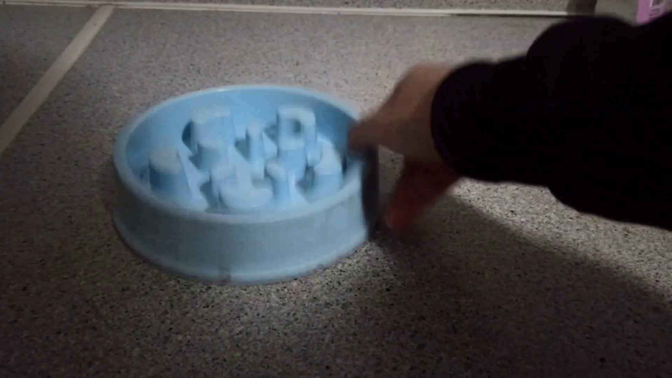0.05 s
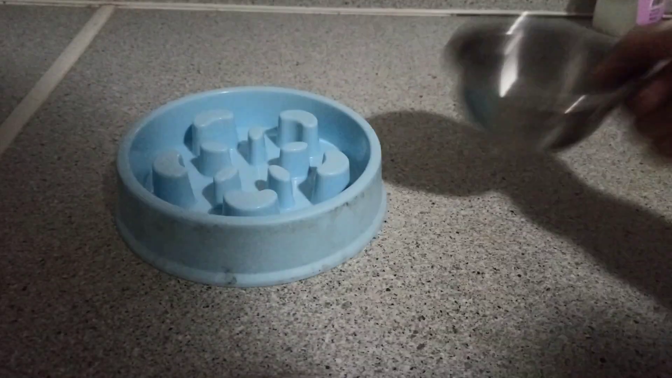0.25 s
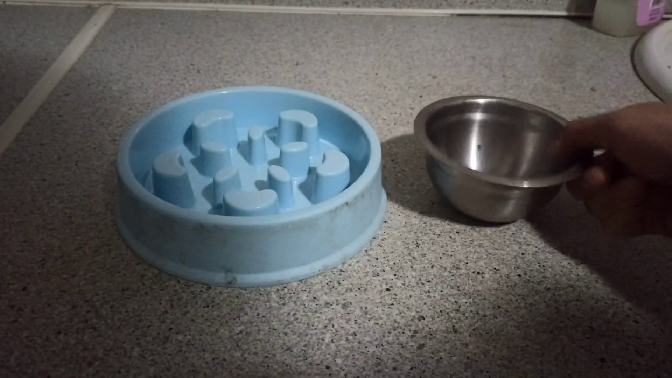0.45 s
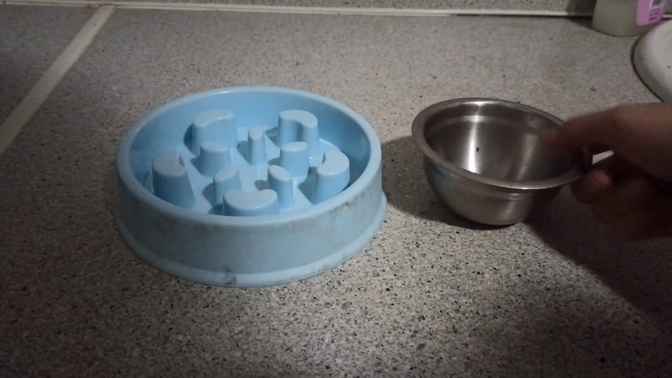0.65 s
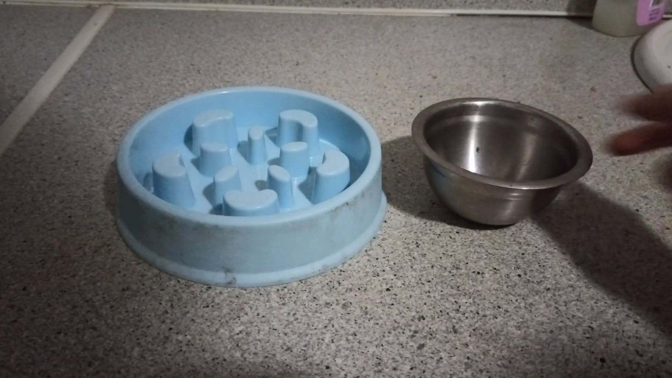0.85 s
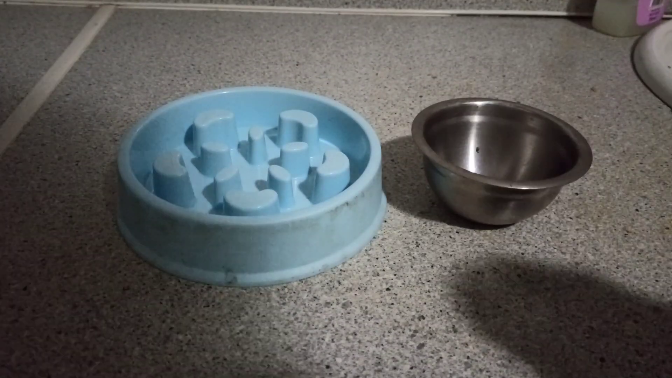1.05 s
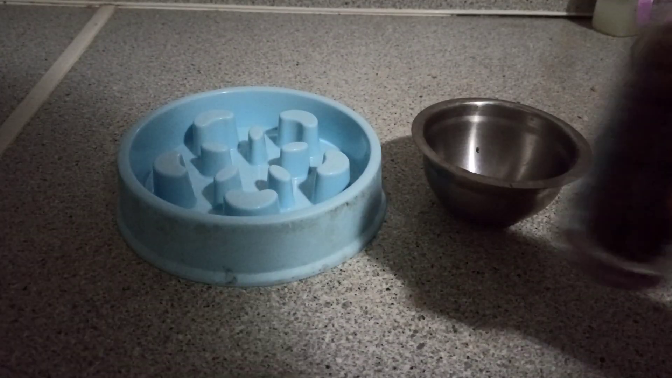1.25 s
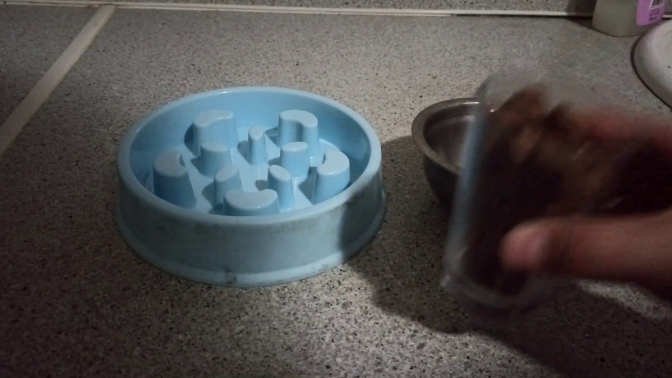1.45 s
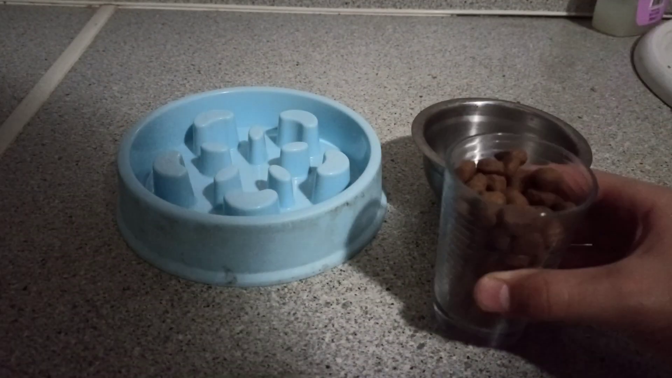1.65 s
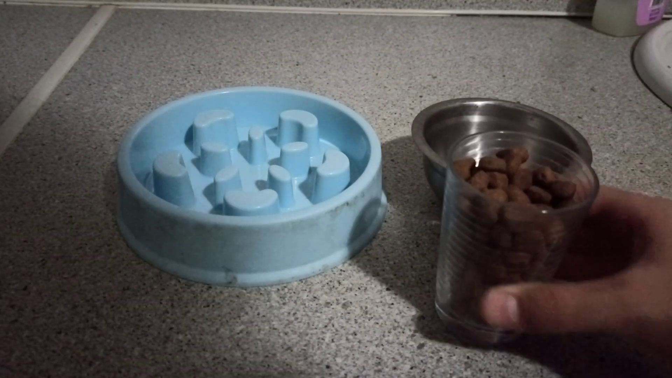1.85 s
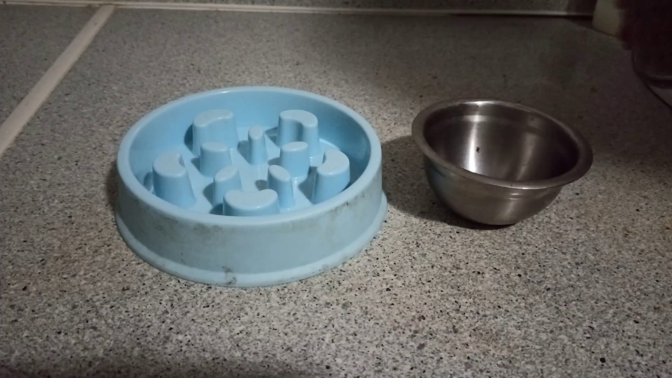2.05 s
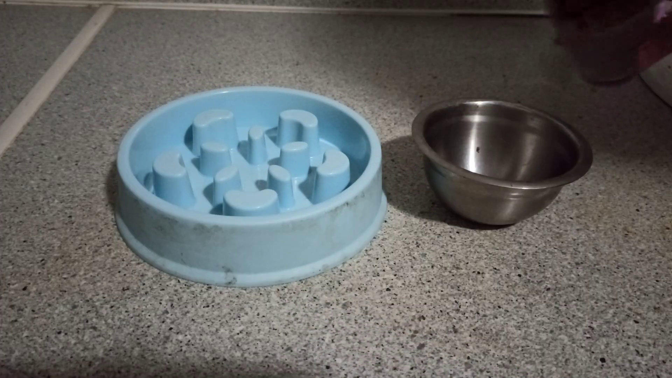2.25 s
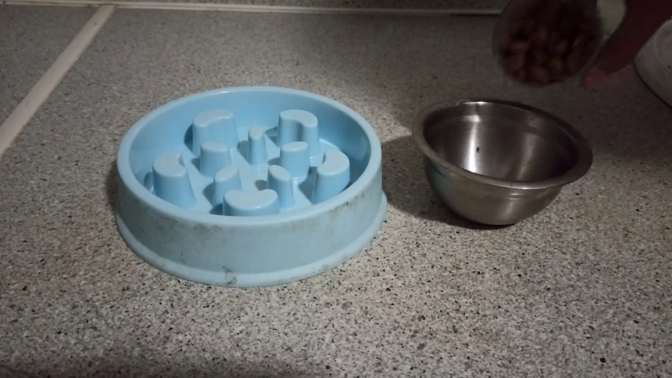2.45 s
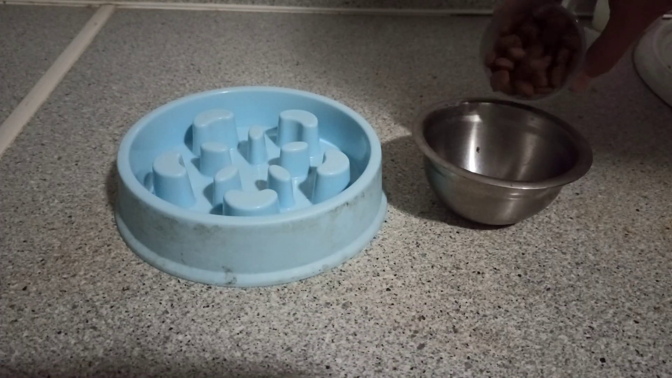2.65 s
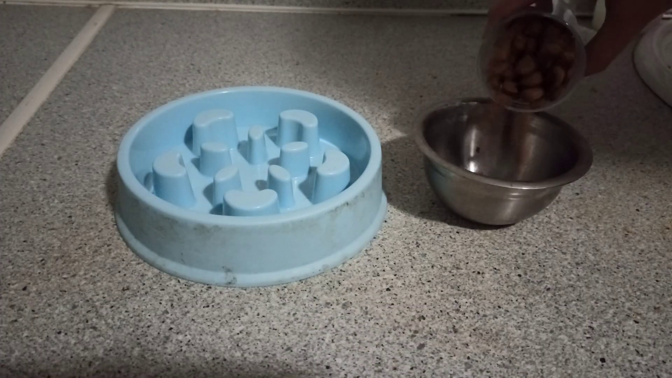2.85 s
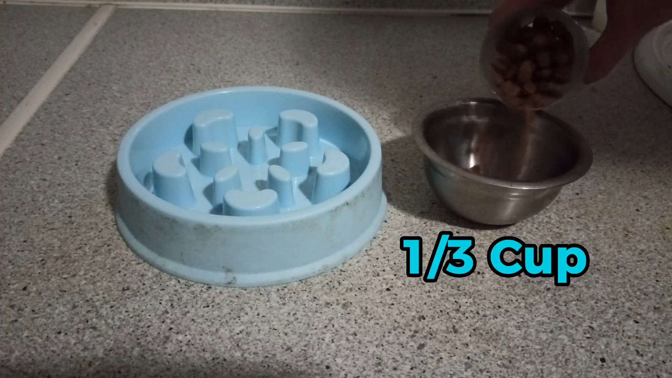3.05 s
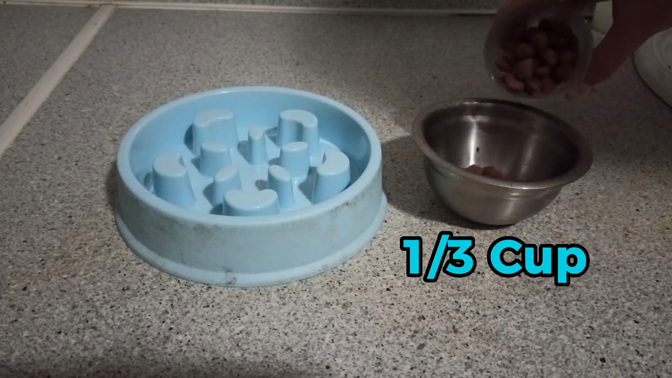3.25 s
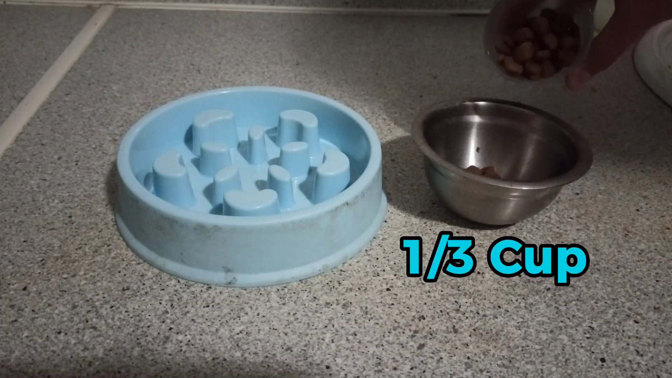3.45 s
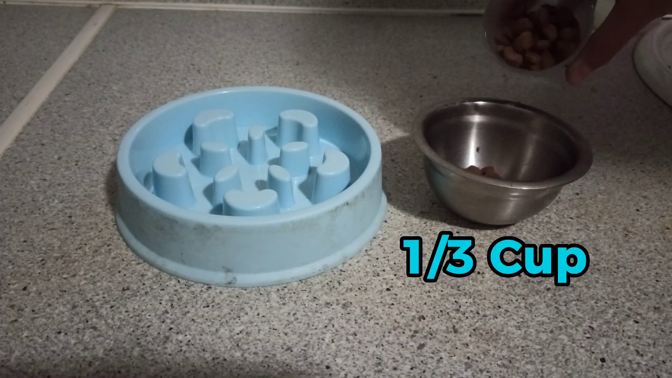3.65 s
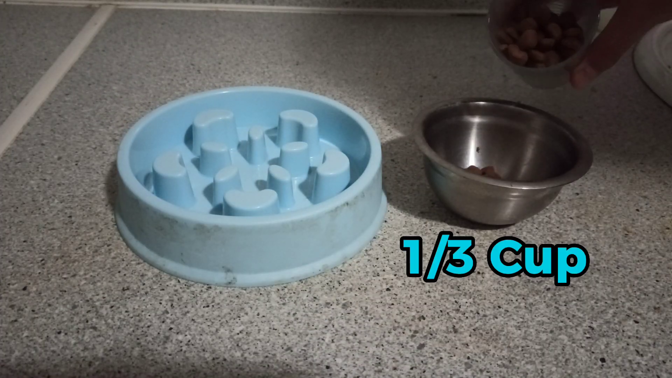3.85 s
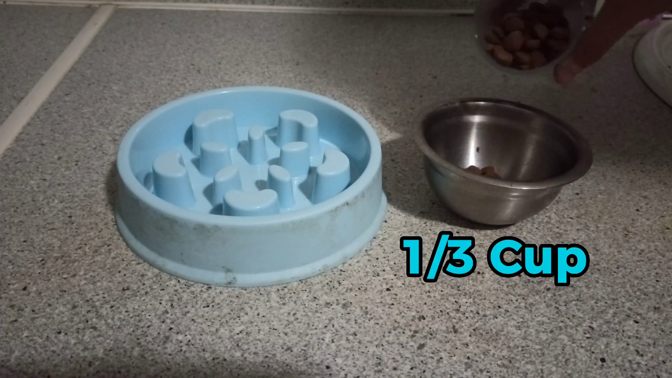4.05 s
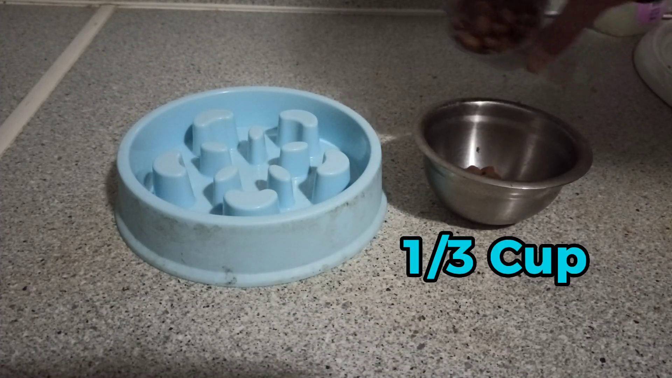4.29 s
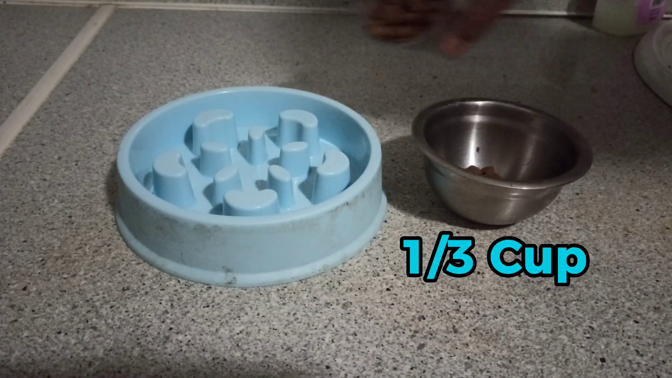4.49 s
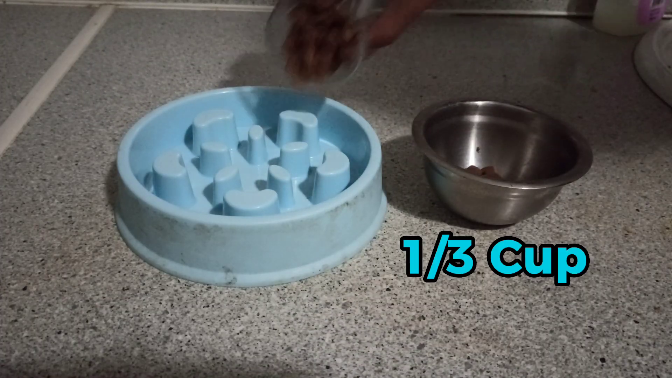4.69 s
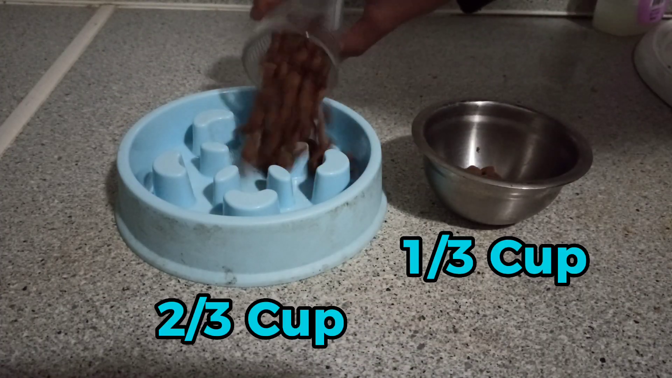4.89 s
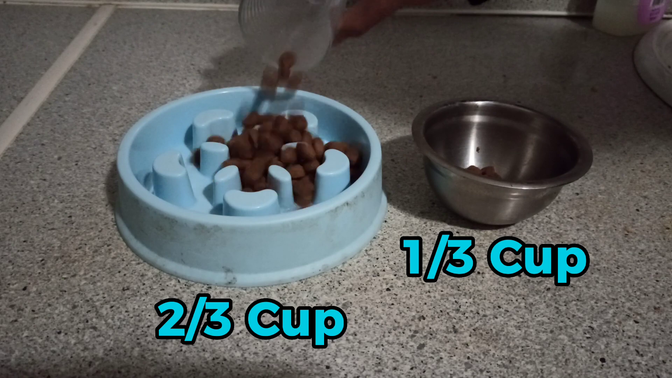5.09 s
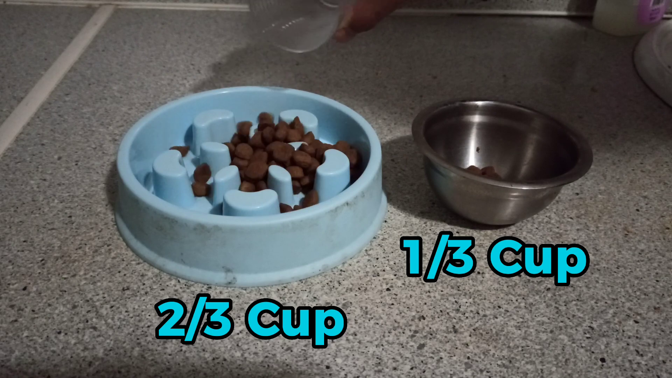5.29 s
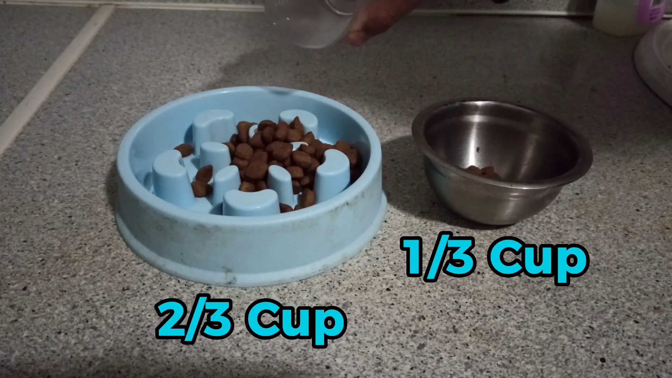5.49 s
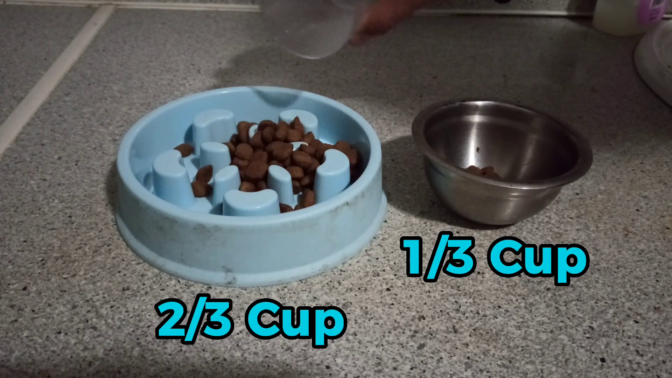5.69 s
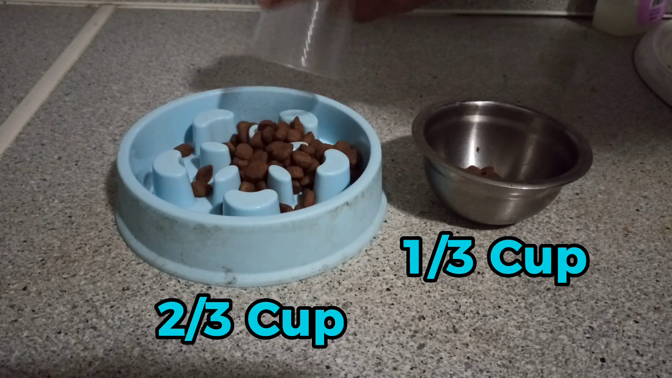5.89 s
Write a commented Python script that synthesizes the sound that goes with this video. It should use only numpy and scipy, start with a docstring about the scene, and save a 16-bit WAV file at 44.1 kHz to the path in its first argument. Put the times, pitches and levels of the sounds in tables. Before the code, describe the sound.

Plastic and steel bowls knock down on a counter, then dry kibble tinkles briefly into steel and pours rattling into hollow plastic.

```python
"""Small hard kitchen: a plastic slow-feeder bowl, a steel bowl and a cup of kibble are set down on a countertop.
The cup is tipped: a few pellets tumble into the ringing steel bowl, then the rest pours into the plastic one.
Each contact is a short coloured noise-like pulse; bowls, cup and counter ring as banks of decaying modes.
A diffuse tail follows the contacts; behind it all are filtered noise and an appliance's wavering tones."""
import sys
import numpy as np
from scipy import signal
from scipy.fft import rfft, irfft, next_fast_len
from scipy.io import wavfile

SR = 44100
rng = np.random.default_rng(int(sys.argv[2]) if len(sys.argv) > 2 else 0)


def wrap_up_sound(samples):
    """Save the sound to the file named by the first command line argument, as 16-bit audio."""
    columns = np.atleast_2d(samples).T
    # keep every value between -1 and 1, then stretch to whole-number steps
    tamed = np.clip(columns, -1, 1)
    steps = np.round(tamed * 32767).astype(np.int16)
    wavfile.write(sys.argv[1], SR, steps)


N = 261513

# left-right likeness of the sound field: f/Hz, correlation/1
LIKENESS = [(30, .65), (120, .92), (280, .83), (600, .42), (1400, .04), (15000, 0)]
# plastic bowl modes: f/Hz, level/dB, t60/s
FEEDER_MODES = [(356.3, -13, 0.3), (472, -6.5, 0.13), (520, -7.5, .11), (610, -17, 0.3), (750, -5.5, 0.071),
                (850, -6.5, 0.04), (1340, -7, 0.11), (1625, -6, 0.12), (1755, -6, 0.14)]
# steel bowl modes: f/Hz, level struck on wall/dB, level struck on foot/dB, t60/s
STEEL_MODES = [(1119, -22.5, -50, 1.5), (2358, -27, -15, .35), (2738, -18, -40, .4), (2829, -15, -40, .4),
               (2997, -15.5, -45, .85), (4444, -19, -30, .3), (4515, -10, -24, .25), (4610, -20, -12, .15),
               (4657, -8, -6, .45), (4665, -20, -9, .4), (4688, -20, -7, .22), (4719, -20, -6, .28),
               (6718, -11, -36, .45), (6783, -15, -36, .45), (7405, -6, -30, .45), (7606, -1.5, -19, .45),
               (8245, -17, -34, .3), (8423, -15, -34, .3), (12980, -27, -32, .2)]
# colour of a light contact on steel: f/Hz, relative level per Hz/dB
STEEL_CLICK = [(40, -61), (200, -27), (550, -8), (850, -12.5), (1200, -3.5), (1750, -9.5), (2700, 4.5),
               (3800, 1.5), (4650, 13), (5600, -4.5), (7000, 9), (8300, 5.5), (12500, -5.5), (15500, -1.5)]
# countertop modes: f/Hz, level/dB, t60/s
COUNTER_MODES = [(166, -6, .55), (260.3, -1, 0.63), (298, -4.5, 0.34), (407, -11.5, .35), (613, -4, .42),
                 (742, -3.5, .35)]
# brightness lost by a contact for each dB below full force (0 dB)
DULLING_DB_PER_OCTAVE_PER_DB = 0.21


def from_db(db):
    """Decibels to gain."""
    return 10 ** (np.asarray(db) / 20)


def at_hz(points, hz):
    """Read a table on a log-frequency axis."""
    known_hz, values = np.transpose(points)
    return np.interp(np.log(np.maximum(hz, 1)), np.log(known_hz), values)


def diffuse_spectrum(size):
    """Spectrum of white stereo noise arriving from all sides: alike in the bass, unrelated in the treble."""
    hz = np.arange(size // 2 + 1) * SR / size
    alike = np.clip(at_hz(LIKENESS, hz), -1, 1)
    mid, side = rfft(rng.standard_normal((2, size)))
    common = np.sqrt(1 + alike) * mid
    opposed = np.sqrt(1 - alike) * side * [[1], [-1]]
    return hz, (common + opposed) / np.sqrt(2)


def contacts(s, level_db, tilt=0):
    """Rows (t/s, level/dB, brightness/(dB/octave)); the softer a contact, the duller."""
    dulling = DULLING_DB_PER_OCTAVE_PER_DB * np.minimum(level_db, 0)
    return np.column_stack([s, level_db, tilt + dulling])


def clumps(drops, count, scatter_s, rebound_db, loss_db, spread_db, tilt_spread):
    """Each clump lands, then its pellets rebound: thick at first, then sparser and weaker over scatter_s."""
    rows = []
    # the overall rebound drop does not dull the rebounds
    undo_dulling = [0, 0, -DULLING_DB_PER_OCTAVE_PER_DB * rebound_db]
    for s, level_db, brightness in drops:
        age = ((np.arange(count) + rng.random(count)) / count) ** 2
        size, tilt = np.clip(rng.standard_normal((2, count)), -2, 2)
        force_db = level_db + rebound_db - loss_db * age + spread_db * size
        rebounds = contacts(s + scatter_s * age, force_db, brightness + tilt_spread * tilt)
        rows += [contacts(s, level_db, brightness), rebounds + undo_dulling]
    return np.vstack(rows)


def covered(hits, db_per_s):
    """As pellets cover a bowl, each later contact stirs its wall less."""
    since_first_s = hits[:, 0] - hits[0, 0]
    return hits - np.outer(since_first_s, [0, db_per_s, 0])


def stream(flows, spread_db, tilt_spread):
    """Random contacts whose rate and force swell, hold and die away together, as rows like contacts()."""
    thinning_db = 11.5  # force lost where the stream is thinnest
    rows = []
    for start, attack, hold, release, per_s, level_db in flows:
        corners_s = np.cumsum([start, attack, hold, release])
        fullness = np.interp(np.arange(N) / SR, corners_s, [0, 1, 1, 0])
        chance = rng.random(N)
        size, tilt = rng.standard_normal((2, N))
        at = np.flatnonzero(chance < fullness * per_s / SR)
        thinned_db = level_db - thinning_db * (1 - fullness[at])
        force_db = thinned_db + spread_db * np.clip(size[at], -2, 1.5)
        rows.append(np.column_stack([at / SR, force_db, tilt_spread * tilt[at]]))
    return np.vstack(rows)


def strike(hits, colour, vary_db, lag, rattle_db, rattle_t60, scatter=0, size=2048):
    """Each contact is a causal pulse and a brief rattle, with its own colour; lag delays the left, in samples."""
    bend_delay_s = .0006  # at 1 kHz; treble runs faster through a plate
    hz, t = np.arange(size // 2 + 1) * SR / size, np.arange(size) / SR
    out = np.zeros((2, N + size))
    octave = np.log2(np.clip(hz, 200, 9000) / 1000)
    knots = np.geomspace(200, 16000, num=24)
    draws = np.random.default_rng(rng.integers(2 ** 31))
    fade = from_db(-60 * t / rattle_t60) * (t > 0)
    fade = from_db(rattle_db) * fade / np.sqrt(np.sum(fade ** 2))
    apart = np.clip(1 - at_hz(LIKENESS, hz), 0, 1) / 2
    bend = np.exp(-4j * np.pi * bend_delay_s * np.sqrt(1000 * hz))
    for s, level_db, tilt in hits:
        luck = draws.standard_normal(len(knots) + 2)
        ripple_db = vary_db * np.interp(hz, knots, luck[2:])
        shape = from_db(at_hz(colour, hz) + tilt * octave + ripple_db)
        shape = shape / np.sqrt(np.mean(shape ** 2))
        # minimum phase: the energy comes at once and then dies away
        cepstrum = irfft(np.log(np.maximum(shape, 1e-3)))
        cepstrum[1:size // 2] *= 2
        spectrum = from_db(level_db) * bend * np.exp(rfft(cepstrum[:size // 2], size))
        mid, side = rfft(fade * draws.standard_normal((2, size)))
        for channel, sign in enumerate((1, -1)):
            rattle = np.sqrt(1 - apart) * mid + sign * np.sqrt(apart) * side
            at = round(s * SR + sign * (lag / 2 + scatter * luck[0]))
            pan = from_db(sign * scatter * luck[1] / 2)
            out[channel, at:at + size] += pan * irfft(spectrum * (1 + rattle))
    return out[:, :N]


def ring(hits, modes, vary_db, centre_hz):
    """Every contact sets each mode ringing with a new strength; a mode's dB is its share of energy."""
    s, level_db, tilt = np.transpose(hits)
    out = np.zeros((2, N))
    draws = np.random.default_rng(rng.integers(2 ** 31))
    luck = draws.standard_normal((len(s), len(modes), 3)).T
    for k, (hz, mode_db, t60) in enumerate(modes):
        r, w = from_db(-60 / (t60 * SR)), 2 * np.pi * hz / SR  # pole radius and angle
        bright_db = tilt * np.log2(hz / centre_hz)
        strength = from_db(level_db + mode_db + bright_db + vary_db * luck[2, k])
        apart = np.sqrt(np.clip(1 - at_hz(LIKENESS, hz), 0, 1))
        for channel in (0, 1):
            clicks = np.full(N, 1e-18)
            # each contact has its own phase in each channel
            at = np.round(s * SR + apart * luck[channel, k] / w).astype(int)
            np.add.at(clicks, at, strength)
            ringing = signal.lfilter([1, 0, -1], [1, -2 * r * np.cos(w), r * r], clicks)
            out[channel] += np.sqrt((1 - r * r) / 2) * ringing
    return out


def kitchen(x, room_db, size=32768):
    """Direct sound and a diffuse tail that builds at once off the counter and walls and dies band by band."""
    # room decay: f/Hz, t60/s
    room_t60 = [(120, 0.74), (400, 0.5), (1200, 0.41), (3500, 0.37), (8000, 0.36), (15000, 0.099)]
    hz, noise = diffuse_spectrum(size)
    t, centres = np.arange(size) / SR, np.geomspace(100, 16000, num=8)
    tail = 0
    for centre, share in zip(centres, np.eye(len(centres))):
        band = irfft(noise * at_hz(np.column_stack([centres, share]), hz))
        tail = tail + band * from_db(-60 * t / at_hz(room_t60, centre))
    tail = tail * np.clip(t / 0.00014, 0, 1)
    tail = tail / np.sqrt(np.sum(tail ** 2) / 2)
    return x + from_db(room_db) * signal.fftconvolve(x, tail, axes=1)[:, :N]


def background():
    """Soft noise rumble, whose midrange sinks for a while, and the slightly wavering hum of an appliance."""
    # noise colour: f/Hz, relative level per Hz/dB
    air_colour = [(25, -37), (60, -21), (85, -10.5), (100, -0.5), (125, -11.5), (200, -9.5), (340, -7),
                  (450, -15.5), (680, -3.5), (1260, -23), (4000, -29.5), (7500, -31.5), (16000, -39.5)]
    # midrange band: f/Hz, share/1
    midrange_share = [(400, 0), (600, 1), (1000, 1), (1600, 0)]
    # midrange level over time: t/s, level/dB
    midrange_db = [(3.3, 1.5), (4.1, -6.5), (4.7, -3), (5.6, 1)]
    # steady tones: f/Hz, RMS level/dB
    hum_tones = [(98, -58.5), (258, -74.5), (301, -67), (490, -67), (667, -71.5), (2110, -78.5),
                 (3978, -81.5)]
    air_db, waver_rad = -53.5, 4.0
    hz, noise = diffuse_spectrum(next_fast_len(N, real=True) * 2)
    t, hum = np.arange(N) / SR, 0
    spectrum = noise * from_db(at_hz(air_colour, hz))
    air = irfft(spectrum)[:, :N]
    midrange = irfft(spectrum * at_hz(midrange_share, hz))[:, :N]
    sinking = midrange * (from_db(np.interp(t, *np.transpose(midrange_db))) - 1)
    for tone_hz, level_db in hum_tones:
        waver = np.interp(t, np.linspace(0, t[-1], num=40), rng.standard_normal(size=40))
        tone = np.sin(2 * np.pi * tone_hz * t + waver_rad * waver)
        hum = hum + np.sqrt(2) * from_db(level_db) * tone
    return from_db(air_db) * (air + sinking) / air.std() + hum


def feeder_set_down():
    """The plastic bowl cracks down on an edge, slides, claps flat and stirs its low modes; the tail breaks off."""
    # edge contacts: t/s, level/dB, brightness/(dB/octave)
    edge_knocks = [(.0134, 10.5, 1.5), (.0146, 8.5, 0), (.0178, 6.5, -5)]
    # flat contacts: t/s, level/dB, brightness/(dB/octave)
    flat_knocks = [(.128, 15.5, -1.5), (.1305, 13, 0), (.1395, 12, -.5), (.1485, 5, -1.5)]
    # slide: start/s, attack/s, hold/s, release/s, contacts/(1/s), level/dB
    slide = [(.02, .005, .085, .04, 650, -13.5)]
    # edge colour: f/Hz, relative level per Hz/dB
    edge_crack = [(60, -34), (250, -25), (550, -14), (850, 0), (1300, -11), (1700, -21), (2500, -23),
                  (3100, -14), (4000, -16), (5200, -27), (6400, -18), (8000, -21), (13000, -31)]
    # flat and sliding colour: f/Hz, relative level per Hz/dB
    thud_colour = [(60, -27), (150, -13.5), (270, -8), (420, -1), (520, 5.5), (780, 3), (1000, -2.5),
                   (1300, 0), (1800, -9.5), (2400, -17.5), (3500, -15.5), (5200, -28), (7000, -17.5),
                   (12500, -44.5), (15500, -36.5)]
    break_s, break_fade_s = .291, .003
    edge = strike(edge_knocks, edge_crack, vary_db=.5, lag=3, rattle_db=-4, rattle_t60=.025)
    sliding = stream(slide, spread_db=5.0, tilt_spread=1.0) + [0, 0, 1.2]
    hits = np.vstack([flat_knocks, sliding])
    thuds = strike(hits, thud_colour, vary_db=2.5, lag=-1.5, rattle_db=0, rattle_t60=0.025)
    low_modes = [mode for mode in FEEDER_MODES if mode[0] < 1000]
    shell = from_db(-7.5) * ring(hits, low_modes, vary_db=0.0, centre_hz=787)
    until_break = np.clip((break_s - np.arange(N) / SR) / break_fade_s, 0, 1)
    return (kitchen(from_db(-4) * thuds + from_db(-1) * edge, room_db=-6) + shell) * until_break


def steel_set_down():
    """The steel bowl lands and bounces on its foot, whose close modes beat, and is nudged into place."""
    # foot contacts: t/s, level/dB, brightness/(dB/octave)
    foot_knocks = [(.4348, 9, -1.23), (.4374, 3, -0.5), (.4888, 7.5, -1)]
    # nudge: start/s, attack/s, hold/s, release/s, contacts/(1/s), level/dB
    slide = [(.655, .025, .015, .045, 1400, -48)]
    # foot colour: f/Hz, relative level per Hz/dB
    thud_colour = [(50, -21.5), (100, -20), (220, -8.5), (420, -8), (600, -2.5), (900, -4), (1350, 2),
                   (1800, -6), (2500, -16.5), (3300, -15), (4600, -26), (5400, -27), (7600, -21),
                   (13000, -33)]
    foot_modes = [(hz, foot_db, t60) for hz, wall_db, foot_db, t60 in STEEL_MODES]
    knocks = strike(foot_knocks, thud_colour, vary_db=1.54, lag=3, rattle_db=3.5, rattle_t60=0.012)
    scrape = stream(slide, spread_db=2.5, tilt_spread=.5)
    nudge = strike(scrape, STEEL_CLICK, vary_db=2, lag=3, rattle_db=0, rattle_t60=.01)
    foot = from_db(-3.5) * ring(foot_knocks, foot_modes, vary_db=1, centre_hz=4000)
    counter = from_db(-12) * ring(foot_knocks, COUNTER_MODES, vary_db=1, centre_hz=400)
    return kitchen(knocks + nudge, room_db=-3.5) + kitchen(foot, room_db=-5) + counter


def cup():
    """The full cup thumps on the counter, which booms; later pellets tick and slide on its wall as it tilts."""
    # cup on counter: t/s, level/dB, brightness/(dB/octave)
    cup_knocks = [(1.5974, 13, 2), (1.5996, 5.5, 3)]
    # pellets shifting against the wall: t/s, level/dB, brightness/(dB/octave)
    cup_ticks = [(1.812, -45, 2), (1.858, -34, 2), (2.4882, -21, 5), (2.518, -41, 0.5), (2.614, -53, 4),
                 (2.6843, -45, -1), (2.7526, -49.5, -7.5), (2.8096, -30, -8), (2.8545, -25.5, 7)]
    # pellets sliding out: start/s, attack/s, hold/s, release/s, contacts/(1/s), level/dB
    slide = [(4.765, 0.071, .015, 0.04, 600, -34)]
    # thump colour: f/Hz, relative level per Hz/dB
    thud_colour = [(50, -34), (100, -8.5), (175, 2.5), (300, 1.5), (480, -10), (700, 2.5), (900, -3),
                   (1300, -3), (2100, -5.5), (2900, -17.5), (4000, -16), (5200, -34), (6500, -22),
                   (13000, -43.5)]
    # tick colour: f/Hz, relative level per Hz/dB
    tick_colour = [(800, -28.5), (2800, -3), (4500, -5.5), (6200, -14.5), (9000, -13), (15000, -17)]
    # cup wall modes: f/Hz, level/dB, t60/s
    cup_modes = [(2660, 0, .04), (2756, 3, 0.1), (2860, 0, .05), (6120, 3, .05), (6212, 7, 0.085),
                 (6300, 3, .06), (6632, -1, 0.06)]
    thump = strike(cup_knocks, thud_colour, vary_db=.8, lag=2, rattle_db=-5, rattle_t60=0.02)
    counter = from_db(-9) * ring(cup_knocks, COUNTER_MODES, vary_db=1, centre_hz=400)
    shifts = np.vstack([cup_ticks, stream(slide, spread_db=3.5, tilt_spread=0.75)])
    ticks = strike(shifts, tick_colour, vary_db=2.5, lag=2, rattle_db=2, rattle_t60=0.04)
    wall = from_db(-8.5) * ring(shifts, cup_modes, vary_db=2.5, centre_hz=4500)
    bumps = kitchen(from_db(-2.5) * thump + from_db(-12.0) * ticks, room_db=1.5)
    return bumps + kitchen(wall, room_db=0.5) + counter


def pour_into_steel():
    """Clumps ring the thin wall, less as they cover it; the bowl rocks; rolling stirs its longest modes."""
    # clumps landing: t/s, level/dB, brightness/(dB/octave)
    steel_drops = [(2.8803, 3.5, 8), (2.9247, -1.5, -2.5), (2.934, -29, -3), (2.982, -1, -3.5),
                   (2.998, -0.5, -1.5), (3.016, -17, -3), (3.0958, 0.5, -1), (3.1142, 2, -2.5),
                   (3.128, -7.5, -2.5), (3.2384, -12, -1), (3.3826, -17.5, -2.5)]
    # bowl rocking on its foot: t/s, level/dB
    steel_rocks = [(2.882, -8), (2.966, -12), (2.994, -11.5), (3.054, -13), (3.125, -17), (3.164, -10),
                   (3.177, -17.5), (3.192, -23), (3.228, -16), (3.286, -17.5)]
    # pellets rolling to rest, as one excitation: t/s, level/dB
    steel_rolls = [(3.17, 10.5)]
    # rocking colour: f/Hz, relative level per Hz/dB
    rock_tap = [(100, -25), (350, -19.5), (580, -6), (850, -6.5), (1300, 0), (1700, -23), (2500, -30),
                (8000, -47.5)]
    long_ring_s = .7  # longer modes are stirred by rolling, not by drops
    # the bowl is not quite round, so its lowest mode beats
    beat_hz, beat_depth, beat_crest_s = 6.6, .95, 3.195
    left_db = -0.5
    hits = clumps(steel_drops, count=4, scatter_s=.05, rebound_db=-11.0, loss_db=22,
                  spread_db=2.5, tilt_spread=1.2)
    wall_modes = [(hz, wall_db, t60) for hz, wall_db, foot_db, t60 in STEEL_MODES]
    short_modes = [mode for mode in wall_modes if mode[2] < long_ring_s]
    long_modes = [mode for mode in wall_modes if mode[2] > long_ring_s]
    clicks = strike(hits, STEEL_CLICK, vary_db=1, lag=3, rattle_db=4, rattle_t60=0.02, scatter=1.1)
    rocks = contacts(*np.transpose(steel_rocks))
    rocking = strike(rocks, rock_tap, vary_db=0.0, lag=3, rattle_db=-6.5, rattle_t60=0.018)
    wall = from_db(3) * ring(covered(hits, db_per_s=26.0), short_modes, vary_db=4.5, centre_hz=4610)
    rolls = contacts(*np.transpose(steel_rolls), tilt=-3.5)
    lowest, upper = [ring(rolls, [mode], vary_db=.5, centre_hz=2980) for mode in long_modes]
    since_crest_s = np.arange(N) / SR - beat_crest_s
    beat = np.sqrt(1 + beat_depth * np.cos(2 * np.pi * beat_hz * since_crest_s))
    bowl = from_db(-1.0) * kitchen(clicks + rocking, room_db=-2) + wall + lowest * beat + upper
    return from_db([[left_db], [-left_db]]) * bowl


def pour_into_feeder():
    """A thick stream drums on hollow plastic, then on the heap; each clump pings on landing; stragglers settle."""
    # clumps landing: t/s, level/dB, brightness/(dB/octave), ping f/Hz, ping level/dB
    feeder_drops = [(4.8488, 5, -1.5, 1700, 1), (4.8555, 3, 1, 7200, 5), (4.8893, 4, 0, 3700, 2),
                    (4.9165, 2, -1, 2400, -1), (4.9256, 3.5, .5, 3350, 7), (4.946, 2.5, -1, 4200, -2),
                    (4.959, 2.5, -1, 3000, -3), (4.9775, 1, 0, 2300, -2), (4.9909, 2, .5, 4100, 2),
                    (4.995, 2, 1, 7000, 6), (5.0667, -2, .5, 5800, -6), (5.0929, -1, -1, 1800, -4),
                    (5.0986, 3, -.5, 6000, -2), (5.107, -1, 0, 6500, -5), (5.1442, -1, 0, 3500, -3),
                    (5.156, -2, -1, 3000, -8), (5.1822, 2, -.5, 3200, -3), (5.2131, 0, .5, 3300, 4),
                    (5.2219, 1, 0, 2900, 1), (5.2766, -2, 0, 3100, -2), (5.3013, -7, 0, 3200, -3),
                    (5.362, -10, -1.5, 3200, -14), (5.3984, -17, 1.5, 3000, -13),
                    (5.4183, -18, 0, 3100, -14), (5.4476, -16, 0, 2900, -16), (5.4584, -23, 0, 3000, -22)]
    # stream on plastic: start/s, attack/s, hold/s, release/s, contacts/(1/s), level/dB
    feeder_flow = [(4.85, .06, .14, .28, 620, -10)]
    # stream on the heap: start/s, attack/s, hold/s, release/s, contacts/(1/s), level/dB
    heap_flow = [(5.05, .17, 0.07, 0.05, 300, -15)]
    # heap settling: start/s, attack/s, hold/s, release/s, contacts/(1/s), level/dB
    heap_settle = [(5.37, .04, .03, .05, 240, -29)]
    # pellet on plastic: f/Hz, relative level per Hz/dB
    feeder_click = [(60, -52), (160, -15), (300, -9), (470, 1.5), (700, -4), (1000, -3), (1700, -1),
                    (2200, -5), (3200, -1.5), (4500, -5), (5200, -8.5), (7500, -6), (12500, -29),
                    (15500, -30)]
    # pellet on pellet: f/Hz, relative level per Hz/dB
    pellet_click = [(60, -22.5), (800, -27), (2200, 9), (2700, 22), (3300, 21.5), (4400, -14.5),
                    (7000, -15.5), (15000, -24.5)]
    # hard pellet's brief ping: multiple of ping f/1, level/dB, t60/s
    pellet_modes = [(1, -1, .006), (1.16, -4, .004)]
    left_db = 0.5
    landings = clumps([drop[:3] for drop in feeder_drops], count=4, scatter_s=.04, rebound_db=-6.0,
                      loss_db=4.0, spread_db=2, tilt_spread=0.5)
    hits = np.vstack([landings, stream(feeder_flow, spread_db=3.0, tilt_spread=2.5)])
    clicks = strike(hits, feeder_click, vary_db=5.0, lag=-2, rattle_db=1, rattle_t60=0.022, scatter=1.4)
    pings = 0
    for s, _, _, hz, ping_db in feeder_drops:
        modes = [(hz * ratio, db, t60) for ratio, db, t60 in pellet_modes]
        pings = pings + ring([(s, ping_db, 0)], modes, vary_db=-0.5, centre_hz=hz)
    on_heap = np.vstack([stream(heap_flow, spread_db=7, tilt_spread=0.63),
                         stream(heap_settle, spread_db=4, tilt_spread=1.7)])
    heap = strike(on_heap, pellet_click, vary_db=1.5, lag=-8.5, rattle_db=-6.5, rattle_t60=0.0045,
                  scatter=6.0)
    shell = from_db(-8.5) * ring(covered(hits, db_per_s=2.5), FEEDER_MODES, vary_db=3, centre_hz=810)
    pellets = kitchen(clicks + from_db(-2.0) * pings + heap, room_db=-6.5)
    return from_db([[left_db], [-left_db]]) * (from_db(-3.0) * pellets + shell)


def dips():
    """Gain that falls quickly, stays down for a moment and creeps back."""
    # brief level dips: t fully down/s, hold/s, depth/dB, recovery time constant/s
    dip_rows = [(0.293, .004, -8, .005), (0.929, 0.041, -33, 0.2), (1.992, 0.0084, -10.5, 0.0074)]
    fall_s = 0.0057
    t, gain = np.arange(N) / SR, 1
    for s, hold_s, depth_db, recovery_s in dip_rows:
        fall = np.clip(1 + (t - s) / fall_s, 0, 1)
        down = fall * np.exp(-np.maximum(t - s - hold_s, 0) / recovery_s)
        gain = gain * (1 - (1 - from_db(depth_db)) * down)
    return gain


def scene():
    """Everything on the counter, over the background."""
    bowls_and_cup = feeder_set_down() + steel_set_down() + cup()
    return bowls_and_cup + pour_into_steel() + pour_into_feeder() + background()


def record(dry, ceiling=0.84):
    """The treble has a hollow near 10 kHz, the level dips, the hardest knocks overload, the top is cut."""
    cutoff_hz = 15550
    notch = signal.cheby1(7, .5, [8600, 11700], "bandstop", fs=SR, output="sos")
    hollow = signal.sosfilt(notch, dry)
    x = (hollow + from_db(-47.5) * dry) * dips()
    x = x / (1 + (x / ceiling) ** 4) ** (1 / 4)  # smooth saturation
    return signal.sosfilt(signal.ellip(10, .2, 80, cutoff_hz, fs=SR, output="sos"), x)


dry = scene()
out = record(dry)
wrap_up_sound(out)
```